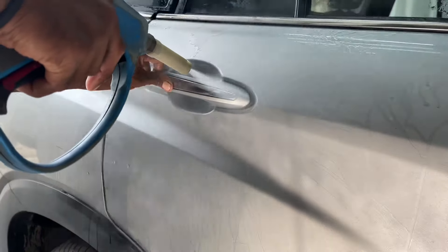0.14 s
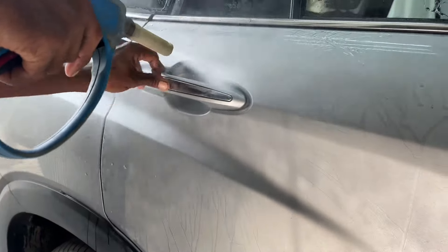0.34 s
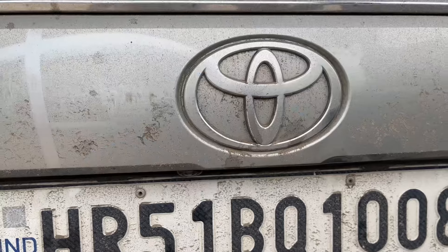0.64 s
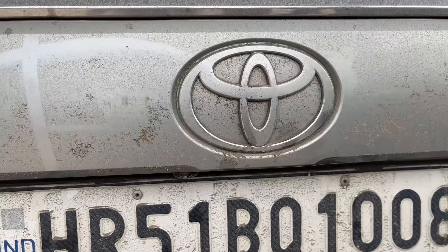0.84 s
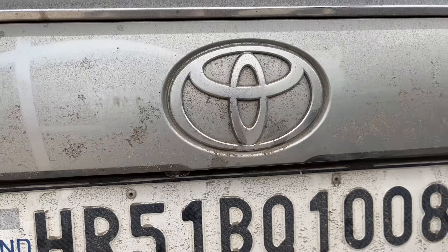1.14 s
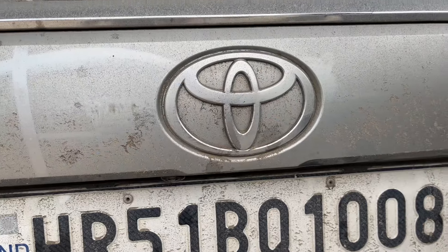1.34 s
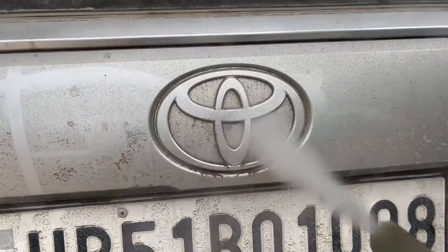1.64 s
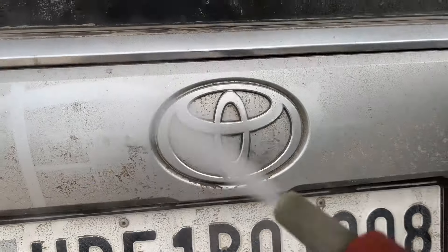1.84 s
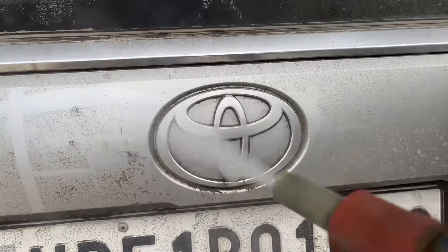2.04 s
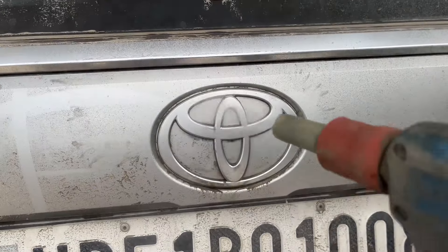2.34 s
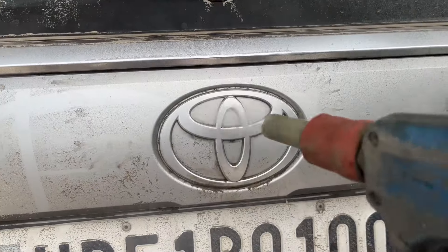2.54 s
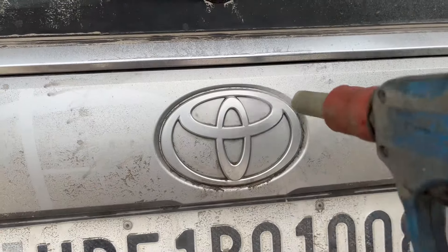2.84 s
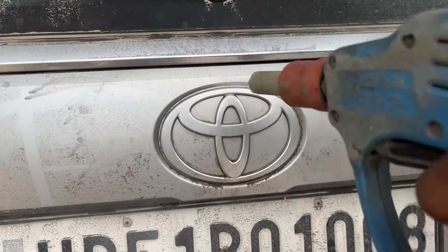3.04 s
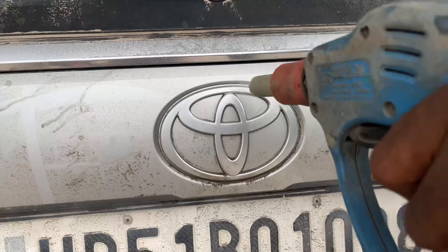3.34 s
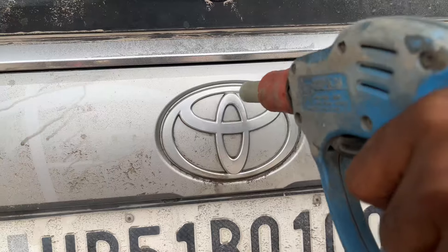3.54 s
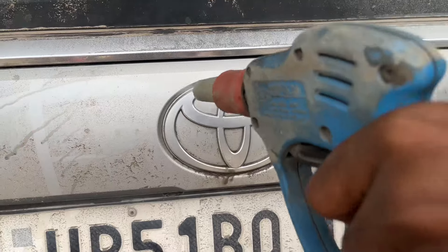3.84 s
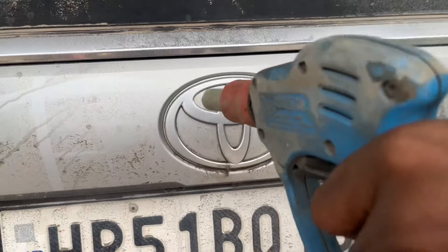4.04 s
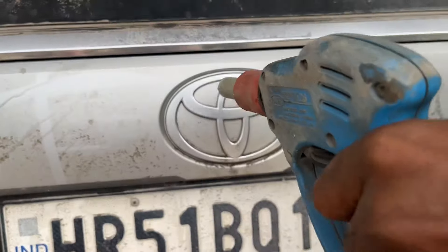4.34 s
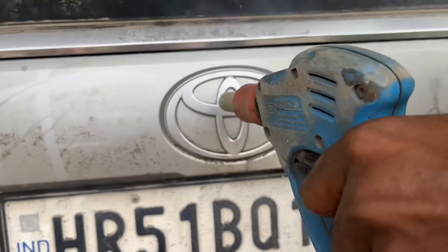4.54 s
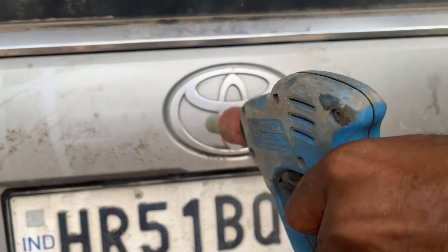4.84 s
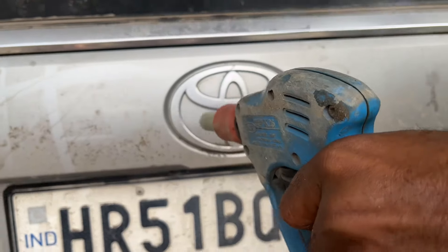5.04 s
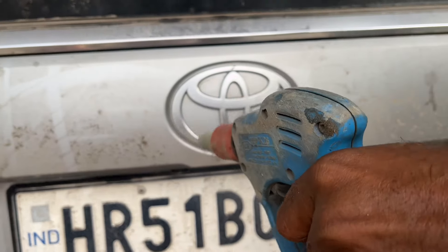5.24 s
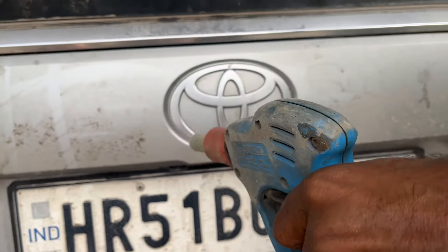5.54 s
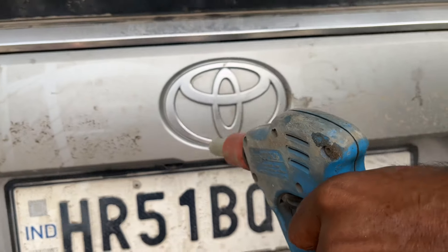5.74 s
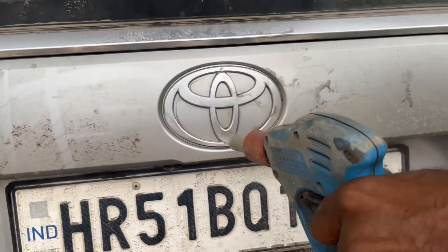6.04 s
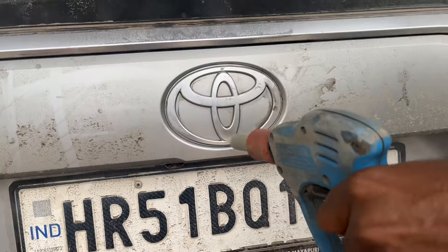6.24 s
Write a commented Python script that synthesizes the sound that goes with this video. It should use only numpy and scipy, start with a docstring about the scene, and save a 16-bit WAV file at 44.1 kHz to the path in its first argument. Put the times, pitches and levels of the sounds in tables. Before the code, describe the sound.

Pressurised steam rushes steadily, stops dead for a fraction of a second, then returns from the left, roars, and settles into a fluttering close hiss.

```python
"""A steam cleaner hisses at a car's door handle outdoors while stray gusts thump on the microphone. The hiss
stops abruptly, and a short lull of rumble and faint hiss fades in. Then the valve opens: the jet starts off to
the left, swings onto the boot badge and scrubs it; as the nozzle closes in, roar gives way to hiss. The jet is
random noise split into four eddy sizes: the largest buffet the microphone, the next two roar and rush where the
plume meets the panel, the finest hiss at the nozzle. Gusts and lull are shaped noise too."""
import sys
import numpy as np
from scipy import signal
from scipy.fft import rfft, irfft
from scipy.io import wavfile
from scipy.ndimage import map_coordinates

SR = 44100
rng = np.random.default_rng(int(sys.argv[2]) if len(sys.argv) > 2 else 0)


def generate_wav(signal):
    """Clip the signal to [-1, 1] and save it as 16-bit WAV at the path in sys.argv[1]."""
    frames = np.transpose(np.atleast_2d(signal))
    scaled = np.clip(frames, -1, 1) * 32767
    pcm = np.round(scaled).astype(np.int16)
    wavfile.write(sys.argv[1], SR, pcm)


N = 282240
TIME = np.arange(N) / SR
HZ = np.maximum(np.arange(N // 2 + 1) * SR / N, 1)   # frequencies of the spectrum; at least 1 for the logarithm
LEFT_RIGHT = np.array([[1], [-1]])   # plus for the left side, minus for the right

# gusts of the plume on the microphone, with their level before rise and decay: start_s, level_db
GUSTS = [(.138, -47.5), (.305, -56), (1.15, -52)]
GUST_ATTACK_S = .008
# the hiss flares as the hand wags the lance across the badge, which may turn the plume aside: # middle_s,
# hiss_gain_db, turned_share (0-1)
SWEEP_FLARES = [(1.53, 2.5, 0), (1.68, 2, 1), (1.82, 2, 0), (1.97, 3.5, 0.98), (2.22, 2.5, 0.9),
                (2.47, 1, 0.92), (2.69, 1.5, 0.7), (2.92, 1, 0.76), (3.15, 0, .6), (5.82, 1.7, 0),
                (6.03, 1.5, 0.01)]


def from_db(db):
    """Turn decibels into a gain."""
    return np.exp(np.asarray(db) * (np.log(10) / 20))


def rms(x):
    """Average strength of a signal (root mean square)."""
    return np.sqrt(np.mean(x ** 2) + 1e-20)


def in_time(rows):
    """Draw each column of a table as a curve over time; the first column is seconds."""
    s, *columns = np.transpose(rows)
    return [np.interp(TIME, s, column) for column in columns]


def in_pitch(rows):
    """Draw each column of a table as a curve over log frequency; the first column is Hz."""
    hz, *columns = np.transpose(rows)
    return [np.interp(np.log(HZ), np.log(hz), column) for column in columns]


def hump(middle_s, length_s):
    """A smooth rise and fall of height 1."""
    return np.cos(np.pi * np.clip((TIME - middle_s) / length_s, -.5, .5)) ** 2


def drift(rate_hz):
    """A slow random curve of spread 1: noise smoothed so that it changes about `rate_hz` times a second."""
    step, run_in = 40, 4000   # samples between points; points skipped while the filter settles
    r = np.exp(-2 * np.pi * step * rate_hz / SR)
    noise = rng.standard_normal(N // step + run_in + 2)
    slow = signal.lfilter([1], [1, -2 * r, r * r], noise)[run_in:]
    return np.interp(np.arange(N) / step, np.arange(len(slow)), slow / rms(slow))


def at_ports(streams, colour, ports):
    """Left and right spectra: the ports share direct sound with a phase lead, but not scattered sound."""
    coherence, lead_rad, balance_db = in_pitch(ports)
    alike = np.clip(coherence, 0, .9999)
    shared, scattered = rfft(streams) * from_db(in_pitch(colour)[0])
    pair = np.sqrt(1 + alike) * shared + LEFT_RIGHT * np.sqrt(1 - alike) * scattered
    return pair * from_db(LEFT_RIGHT * balance_db / 2) * np.exp(LEFT_RIGHT * .5j * lead_rad)


def lull():
    """Outdoor rumble and faint steam: coloured noise that fades in, then sinks to a steady floor."""
    # spectrum of the open air and faint steam: freq_hz, relative level_db_per_hz
    air_colour = [(30, -4), (100, 4), (220, -4.5), (500, -14.5), (1700, -19), (2800, -17), (5000, -11.5),
                  (11000, -17.5), (14000, -25.8)]
    # how the two microphone ports hear it: freq_hz, coherence (0-1), left_lead_rad, left_minus_right_db
    air_ports = [(100, .97, 0, 0), (700, 0.68, .2, 1), (2500, .3, .5, 0), (8000, .3, 1, 0),
                 (11000, 0.9, 0, 0)]
    start_s, rise_s = 0.545, 0.028
    start_db, sink_db_per_s, floor_db = -47.5, 42, -65
    air = irfft(at_ports(rng.standard_normal((2, N)), air_colour, air_ports), N)
    age_s = np.maximum(TIME - start_s, 0)
    level_db = np.maximum(start_db - sink_db_per_s * (age_s - rise_s), floor_db)
    fade_in = np.minimum(age_s / rise_s, 1) ** 2
    return air / rms(air.mean(axis=0)) * fade_in * from_db(level_db)


def puffs():
    """Stray gusts of the plume push on the microphone: low-pitched noise that rises fast and dies away."""
    top_hz, decay_s = 125, 0.057
    low_pass = signal.butter(2, top_hz, "low", fs=SR, output="sos")
    wind = signal.sosfilt(low_pass, rng.standard_normal(N))
    push = 0
    for start_s, level_db in GUSTS:
        age_s = TIME - start_s
        rise = np.clip(age_s / GUST_ATTACK_S, 0, 1)
        push = push + from_db(level_db) * rise * np.exp(-np.maximum(age_s, 0) / decay_s)
    return push * wind / rms(wind)


def turbulence(drops_per_s, drop_db, flutter_db, flutter_hz):
    """Two unrelated streams of fluttering jet noise, flecked with drops of condensate that hit the paint."""
    hits = rng.random((2, N)) < drops_per_s / SR
    sizes = from_db(drop_db + 2.6 * np.minimum(rng.exponential(1, (2, N)), 4))   # drop_db is the smallest
    flutter = from_db(flutter_db * drift(flutter_hz))
    return (rng.standard_normal((2, N)) - hits * sizes) * flutter


def bodywork(x, echo_db, longest_ms, sway_ms, sway_hz, reflect_hz, count):
    """Glancing reflections off trim and gun dapple the spectrum; their paths shift as the hand sways."""
    # small faces return mainly short waves
    high_pass = signal.butter(1, reflect_hz, "high", fs=SR, output="sos")
    glints = signal.sosfilt(high_pass, x)
    delays_ms = longest_ms * (np.arange(count) + rng.uniform(.5, 1.5, count)) / count
    out = x.copy()
    for k, delay_ms in enumerate(delays_ms):
        lag = (delay_ms + sway_ms * drift(sway_hz)) * SR / 1000   # in samples
        echo = np.take(glints, np.arange(N) - lag.astype(int), axis=1, mode="wrap")
        out += (-1) ** k * from_db(echo_db) * echo   # every other echo is upside down
    return out


def unsteadiness():
    """What hand-made swells, sweep flares and chance wavering add to buffet, roar, rush and hiss, in dB."""
    # the jet swells or sags as the hand moves it over edges and hollows, before each eddy size takes its share:
    # middle_s, length_s, gain_db
    hand_swells = [(0.048, 0.29, 3), (1.322, 0.051, 4), (2.03, 0.087, 2.5), (3.067, 0.17, 2),
                   (3.77, 0.16, -1), (3.906, 0.18, 1.5), (4.11, 0.18, 1.5), (4.34, 0.17, 1.5),
                   (4.697, 0.12, 1.5), (4.8, 0.16, -2.4), (4.91, 0.12, 2), (5.025, 0.11, -2),
                   (5.445, 0.23, -2), (5.673, 0.1, -3.5), (6.026, 0.16, 2.5), (6.16, 0.092, -0.5),
                   (6.25, .12, 1.5)]
    # how much of the swells buffet, roar, rush and hiss follow (0-1)
    swell_shares = (0.16, 0.99, 0.92, 0.62)
    together_spread_db, own_spread_db, waver_hz = 0.58, 0.54, 11   # all eddy sizes alike, and each by itself
    flare_s = 0.16
    swell_db = sum(db * hump(s, length_s) for s, length_s, db in hand_swells)
    together_db = together_spread_db * drift(waver_hz)
    buffet, roar, rush, hiss = [share * swell_db + together_db + own_spread_db * drift(waver_hz)
                                for share in swell_shares]
    flare_db = sum(db * hump(s, flare_s) for s, db, _ in SWEEP_FLARES)
    return np.array([buffet, roar, rush, hiss + flare_db])


def jet(streams, colour, ports, levels_db):
    """Turbulence split into overlapping eddy sizes, each as strong as the aim of the lance makes it."""
    # eddy sizes, from buffet through roar and rush to hiss: centre_hz, core_from_hz, core_to_hz
    eddy_sizes = [(200, 50, 400), (1500, 1000, 2500), (4800, 3500, 7000), (10500, 9000, 13500)]
    spectra = at_ports(streams, colour, ports)
    power = np.mean(np.abs(spectra) ** 2, axis=0)
    centres = np.log([row[0] for row in eddy_sizes])
    peaks = np.eye(len(eddy_sizes))   # each size is full at its own centre and gone at its neighbours'
    out = 0
    for peak, (_, low_hz, high_hz), level_db in zip(peaks, eddy_sizes, levels_db):
        core_rms = np.sqrt(2 * power[(HZ > low_hz) & (HZ < high_hz)].sum()) / N
        share = np.interp(np.log(HZ), centres, peak)
        eddies = irfft(spectra * share, N) / core_rms
        out = out + eddies * from_db(level_db)
    return out


def door_handle(streams, unsteady_db):
    """Steam on the door handle: jet noise, buffeted more from the first gust on, that breaks off abruptly."""
    # spectrum of the jet on the handle: freq_hz, relative level_db_per_hz
    door_colour = [(30, -24), (80, -31), (250, -30.5), (500, -26), (800, -15), (1500, -9), (2500, -8.5),
                   (5200, -3.5), (8300, -3), (9600, 1), (10600, -4), (11800, -1.5), (13000, -5),
                   (14500, -6)]
    # how the two microphone ports hear it: freq_hz, coherence (0-1), left_lead_rad, left_minus_right_db
    door_ports = [(900, 1, 0, 0), (1500, 0.23, -0.8, -0.1), (2800, 0.03, -4, 0.5), (5170, 0.18, -3.5, 2.5),
                  (6800, 0.35, -1.3, 0), (8100, 0.78, -3.0, -2), (8940, 0.01, -5.5, -2),
                  (9600, 0.63, -4.5, -3.9), (10600, 1, -6.2, 1), (12900, 1, -6.3, 0), (13750, .62, -7.8, 0),
                  (14700, 0.99, -9.42, 0.5)]
    # levels before the unsteadiness: buffet_db, roar_db, rush_db, hiss_db
    door_levels = (-68, -40, -28.5, -26)
    breeze_db = 7   # extra buffet that the first gust leaves behind
    stop_s, drop_db, fade_db_per_s = 0.5064, 15, 1500   # a sudden drop, then a short fade
    buffet_db, *others_db = np.array(door_levels)[:, None] + unsteady_db
    arrived = np.clip((TIME - GUSTS[0][0]) / GUST_ATTACK_S, 0, 1)
    steam = jet(streams, door_colour, door_ports, [buffet_db + arrived * breeze_db, *others_db])
    stop_db = np.where(TIME < stop_s, 0, -drop_db - fade_db_per_s * (TIME - stop_s))
    return steam * from_db(stop_db)


def panel_echo(x):
    """The treble bounces off the panel beside the nozzle; ridges in the hiss glide as that short path changes."""
    # the echo, whose delay is 1 / ridge spacing: time_s, ridge_spacing_hz, strength (0-1)
    panel_path = [(1.3, 3250, 0), (1.42, 3140, 0.4), (1.55, 2760, 0.46), (1.68, 3120, 0),
                  (1.86, 3650, 0.14), (1.98, 3120, 0.16), (2.22, 3100, 0.13), (2.37, 2780, 0),
                  (2.48, 3100, 0.1), (2.6, 2750, 0), (2.7, 3030, 0.15), (2.8, 2700, 0.06), (2.92, 3060, 0),
                  (3.06, 2740, 0), (3.5, 2750, .05)]
    reflect_hz = 4600   # the panel returns mainly what lies above this
    spacing_hz, strength = in_time(panel_path)
    high_pass = signal.butter(1, reflect_hz, "high", fs=SR, output="sos")
    treble = signal.sosfiltfilt(high_pass, x)
    echo = [map_coordinates(side, [np.arange(N) - SR / spacing_hz], order=3) for side in treble]
    return x + strength * np.array(echo)


def tone_changes(x):
    """Late tone changes of the jet: some broad bands swell, others sink."""
    # bands that swell or sink for a while: start_s, end_s, centre_hz, width_hz, gain_db
    band_changes = [(3.6, 5.3, 640, 650, 2), (4.5, 6.5, 2300, 699, -3), (5.0, 5.327, 6600, 2500, 1.5),
                    (5.1, 6.5, 1350, 603, 2.5)]
    fade_s = 0.11
    for start_s, end_s, hz, width_hz, db in band_changes:
        inside = np.clip(np.minimum(TIME - start_s, end_s - TIME) / fade_s, 0, 1)
        band = signal.lfilter(*signal.iirpeak(hz, hz / width_hz, fs=SR), x)
        x = x + (from_db(db * inside) - 1) * band
    return x


def moving_band(x, hz, width_hz, size=128):
    """Pick out a band whose centre moves, with a resonant filter retuned every `size` samples."""
    out, state = np.zeros_like(x), np.zeros((len(x), 2))
    r = np.exp(-np.pi * width_hz / SR)
    zeros = np.array([1, 0, -1]) * (1 - r * r) / 2
    for i in range(0, N, size):
        poles = [1, -(1 + r * r) * np.cos(2 * np.pi * hz[i] / SR), r * r]
        out[:, i:i + size], state = signal.lfilter(zeros, poles, x[:, i:i + size], zi=state)
    return out


def thinned_band(x):
    """A narrow band near 2.4-3 kHz is thinned in the middle and slightly raised at the sides; its centre wanders."""
    # course of the thinned band: time_s, centre_hz, wander_hz, depth (0-1)
    band_course = [(0.7, 2980, 20, .9), (1.05, 2980, 25, .85), (1.21, 2740, 30, .9), (1.3, 2420, 30, 0.9),
                   (1.45, 2590, 40, 0), (1.62, 2700, 36, 1), (2.1, 2830, 110, 0.5), (3.0, 2900, 140, 0.5),
                   (3.4, 2800, 180, 0.5), (6.4, 2950, 260, 0.8)]
    width_hz, side_gain, tremble_hz = 320, .25, 7
    centre_hz, wander_hz, depth = in_time(band_course)
    mid_and_side = np.array([x[0] + x[1], x[0] - x[1]]) / 2
    mid, side = moving_band(mid_and_side, centre_hz + wander_hz * drift(tremble_hz), width_hz)
    return x + np.clip(depth, 0, 1) * (side_gain * side * LEFT_RIGHT - mid)


def boot_badge(streams, unsteady_db):
    """The valve opens off to the left, the plume swings onto the badge and scrubs it, and the nozzle closes in."""
    # draught of the plume on the microphone, before the unsteadiness: time_s, buffet_db
    draught = [(0.75, -58), (0.92, -56), (1.275, -43.5), (1.305, -33.5), (1.6, -35.5), (1.85, -38),
               (2.28, -48), (2.7, -47), (3.2, -50.5), (3.85, -55.5), (5.5, -61.5), (6.4, -64.5)]
    # course of the jet as the nozzle nears the paint, before the unsteadiness: time_s, roar_db, rush_db, hiss_db
    jet_course = [(0.75, -38.5, -28.6, -30.5), (1.0, -38, -28, -28.5), (1.29, -41.5, -29, -30.8),
                  (1.32, -31, -28.5, -27), (1.65, -27, -20, -21.5), (2.0, -26.5, -22, -23),
                  (2.85, -32.5, -22, -19.9), (3.6, -37.5, -26, -22), (4.2, -37.5, -23, -21.0),
                  (4.65, -41.5, -26.5, -22), (5.55, -38.5, -26.5, -23), (5.85, -44, -30, -26.5),
                  (6.4, -43.5, -32, -26.5)]
    # pose of the lance: time_s, pose (0 = off to the left, 1 = on the edge of the plate,
    # 2 = slanting onto the badge, 3 = close over it)
    aim_path = [(1.27, 0.025), (1.32, 0.85), (1.5, 1.0), (1.57, 2), (2.3, 2.05), (2.8, 2.4), (3.3, 3)]
    # close over the badge the hand scrubs to and fro: far_end_s, reach (0-1)
    scrub_strokes = [(3.27, 0.36), (3.45, 0.33), (3.64, .8), (3.87, 0.96), (4.09, 1), (4.31, 0.8),
                     (4.52, 0.6), (4.69, 0.9), (4.9, 0.98), (5.12, 1), (5.3, .9), (5.44, .4), (5.58, .95),
                     (5.78, 0.5)]
    # spectra of the jet in its poses: freq_hz, relative level_db_per_hz
    aside_colour = [(30.0, -27), (90, -15), (150, -9), (280.0, -17), (500.0, -21), (1000.0, -14.5),
                    (1600.0, -10), (3000.0, -3), (5500.0, -1), (6300.0, -2.5), (8800.0, -2.5),
                    (9500.0, 0.5), (10300.0, -3.5), (13000.0, -6.5), (14500.0, -6)]
    slant_colour = [(25.0, -35), (60.0, -8.5), (130.0, -9.5), (450.0, -9), (750.0, -6.5), (1300.0, 0),
                    (2900.0, 0.5), (4600.0, -2), (7200.0, -1), (9000.0, -0.5), (9700.0, 0.5),
                    (12300.0, -0.5), (13300.0, -5.5), (14500.0, -4.5)]
    close_colour = [(25.0, -42), (70.0, -20), (140.0, -20), (260.0, -25.5), (500.0, -22), (850.0, -18),
                    (1300.0, -14.0), (2400.0, -10), (4500.0, -6.5), (7400.0, -0.9), (9700.0, 1),
                    (12300.0, -0.5), (13300.0, -3), (14500.0, -4)]
    turned_colour = [(25, -35), (60, -6), (130, -9.5), (450, -10), (750, -5.5), (1300, 0.5), (2900, 0),
                     (4600, -1.5), (6500, -1.5), (7900, -2), (9700, -.5), (12300, -0.5), (13300, -4.5),
                     (14500, -4)]   # plume turned aside as the hand wags the lance
    # how the two microphone ports hear each pose: freq_hz, coherence (0-1), left_lead_rad, left_minus_right_db
    aside_ports = [(100.0, .92, .1, 1), (600.0, 0.8, 1.0, 2.5), (1400.0, 0.63, 0.2, 2.5),
                   (2310, 0.35, 1, -2.5), (2980, 0.5, 2.5, 2), (3760, 0.4, 3.5, 5), (4650, 0.2, 0.9, 10.5),
                   (5600.0, 0.44, 2.5, 6.5), (6800, 0.2, 5.5, -0.5), (7830, 0.99, 3, 0),
                   (8250, 0.98, 3.5, 2), (9500.0, 0.3, 1.5, -2), (11000.0, 1, 0, -0.1),
                   (13000, 1, -0.1, 0.1), (13750, .5, -2, 0), (14440, 1.0, -3, -0.5)]
    edge_ports = [(100, 0.72, .1, 3), (334, 0.85, 0.48, 5.5), (770, 0.82, 2.7, 5), (1290, 0.9, 5.6, 4),
                  (2000, .35, 5.9, 5), (2500, 0.35, 9.7, -3), (3480, .15, 13.2, 5), (4500, 0.34, 13, 9.5),
                  (6500, 0.67, 16.9, -1), (7700, 1, 15.7, -0.5), (8500, 1, 15.7, 0), (9400, 0.57, 14.4, -1),
                  (10500, 1, 13, 0), (13000, .98, 12.5, 0), (13750, .45, 11, 0), (14300, 0.98, 9.42, -1)]
    slant_ports = [(101, 0.7, 0.15, 2), (330, 0.75, 0.66, 2.5), (580, 0.49, 2.2, 3), (1290, 0.51, 5.54, 3),
                   (2050, 0.45, 6.1, 1.9), (2720, 0.28, 9.7, 2), (3470, 0.12, 13, 2.5),
                   (4100.0, 0.44, 10.7, 4.5), (5100, 0.64, 13.8, -1), (6740, 0.3, 13.4, 0.5),
                   (7600, 0.97, 15.7, 1), (8500, 0.98, 15.75, -0.5), (9530, 1, 14.2, -4),
                   (10600, 1, 12.1, 0.5), (13000, 0.99, 12.5, 0), (13750, .5, 11, 0),
                   (14500, 1.0, 9.42, 0.0)]
    close_ports = [(700, 1, 0, -0.5), (1400, .76, -.5, -.3), (2170, 0.42, 0, 0.5), (2800, 0.35, 3.5, 0.5),
                   (3500, .05, 3.5, 1), (4180, .11, 5, 7), (4960, 0.24, 5.9, 1), (5830, 0.28, 7, -.7),
                   (6730, .45, 7, .2), (7280, .5, 8.5, .2), (7710, 1, 9.5, 0.5), (8420, 1, 9.5, 1),
                   (9000, 0.65, 8.7, -1), (9670, .6, 7.3, -2), (10700, 1, 6.3, 0), (12900, .99, 5.5, 0),
                   (13700, .48, 5, 0), (14500, 0.98, 3, 0)]
    reach_ports = [(704, 1, -0.5, -0.2), (1400, 0.78, -0.5, 1), (2170, 0.32, 1.0, -0.5),
                   (2740, 0.32, 3.5, -0.1), (3480, 0.16, 0.3, 2), (4200, 0.23, -0.2, 7),
                   (5000, 0.44, 1.1, 2.2), (5800, 0.87, 2.9, 0.6), (6540, 0.75, 3, 0.4),
                   (7250, 0.76, 3, -4), (8140, 0.85, 3.6, 2.5), (9000, 0.3, 0.7, 1), (9750, 0.74, 2, -1.3),
                   (10700, 0.93, 0.64, 0.4), (12900, 1, -1, -0.1), (13700, 0.51, -0.8, -0.0),
                   (14500, 1, -4, -0.1)]   # far end of a scrubbing stroke
    turned_ports = [(100, 0.76, .15, 0), (400, 0.87, 1, 1), (700, 0.56, 1.9, 3.5), (1390, 0.59, 5.6, 1),
                    (2180, .4, 6.4, .3), (2800, 0.48, 9.4, -1), (3500, 0.24, 10.2, 0),
                    (4200, 0.42, 10.5, 1.7), (4940, 0.55, 12.2, -2.5), (5830, 0.52, 10.9, -1),
                    (6500, 1, 12.6, .3), (7250, 1, 12.5, 1), (8100, 0.5, 14.4, 4), (9000, 0.38, 12.3, 1.5),
                    (10100, 0.89, 15.8, -1), (10800, .97, 12.57, 0), (13000, 0.99, 12.57, 0),
                    (13750, .55, 11.2, 0), (14400, 1, 9.57, 0)]
    turn_s, stroke_s = .18, .24
    valve_open_s, valve_rise_s = 0.678, 0.019

    levels_db = np.array(in_time(draught) + in_time(jet_course)) + unsteady_db
    aim = np.clip(in_time(aim_path)[0], 0, 3)
    turned = np.clip(sum(turn * hump(s, turn_s) for s, _, turn in SWEEP_FLARES), 0, 1)
    reach = np.clip(sum(far * hump(s, stroke_s) for s, far in scrub_strokes), 0, 1)
    aside, edge, slant, close = [np.clip(1 - np.abs(aim - k), 0, 1) * (1 - turned) for k in range(4)]
    poses = [(aside, aside_colour, aside_ports),
             (edge, slant_colour, edge_ports),
             (slant, slant_colour, slant_ports),
             (close * (1 - reach), close_colour, close_ports),
             (close * reach, close_colour, reach_ports),
             (turned, turned_colour, turned_ports)]
    plume = 0
    for k, (share, colour, ports) in enumerate(poses):
        own = np.roll(streams, k * SR, axis=1)   # turbulence a second apart is unrelated
        plume = plume + np.sqrt(share) * jet(own, colour, ports, levels_db)   # poses blend at equal power
    flow = 1 - np.exp(-np.maximum(TIME - valve_open_s, 0) / valve_rise_s)
    return thinned_band(tone_changes(panel_echo(plume))) * flow


def scene():
    """Mix the lull and gusts with the jet, first on the door handle and then on the boot badge."""
    streams = turbulence(drops_per_s=500, drop_db=6.0, flutter_db=0.5, flutter_hz=35)
    streams = bodywork(streams, echo_db=-12.5, longest_ms=6.0, sway_ms=.35, sway_hz=.3,
                       reflect_hz=2020, count=8)
    unsteady_db = unsteadiness()
    background = lull() + puffs()
    return background + door_handle(streams, unsteady_db) + boot_badge(streams, unsteady_db)


def record(dry):
    """The microphone sheds the deepest rumble, and a steep filter cuts the top."""
    low_cut_hz, top_cut_hz = 31, 14900
    lean = signal.sosfilt(signal.butter(2, low_cut_hz, "high", fs=SR, output="sos"), dry)
    return signal.sosfilt(signal.ellip(12, .2, 80, top_cut_hz, fs=SR, output="sos"), lean)


dry = scene()
out = record(dry)
generate_wav(out)
```